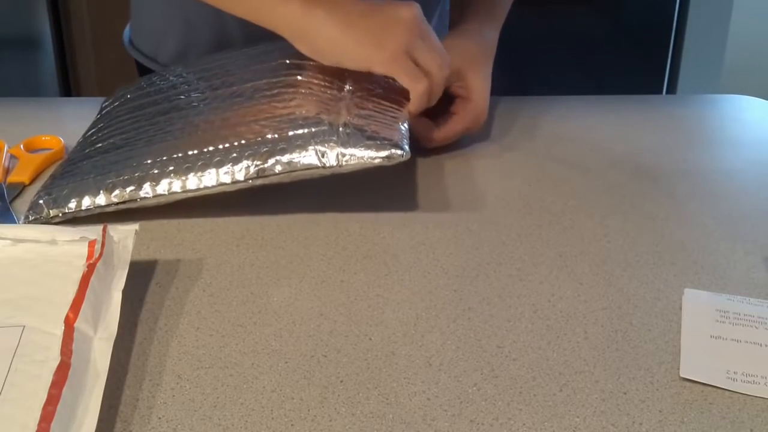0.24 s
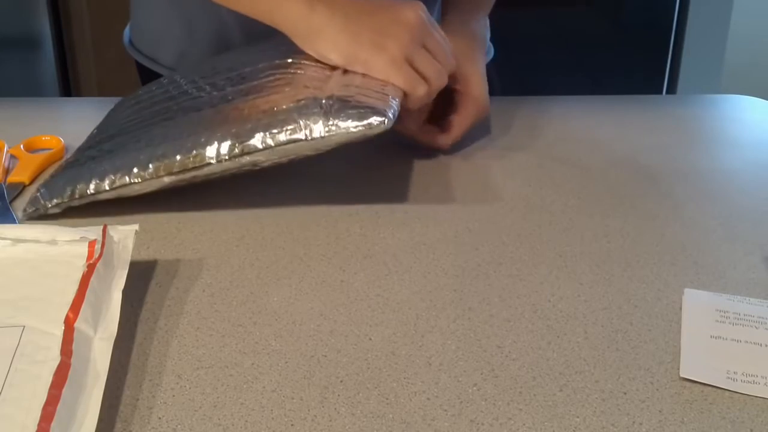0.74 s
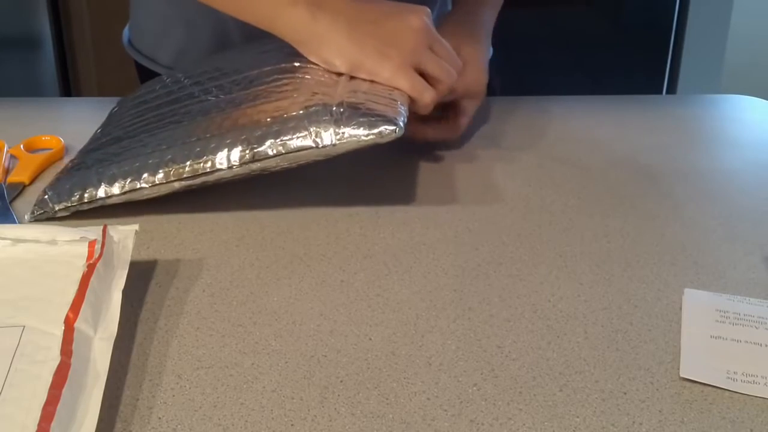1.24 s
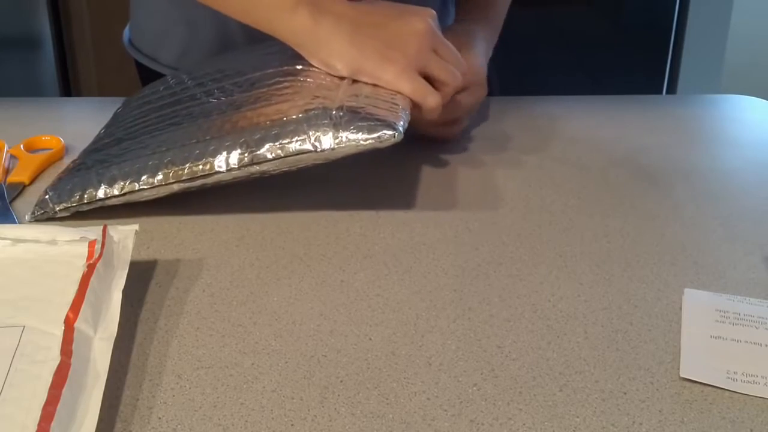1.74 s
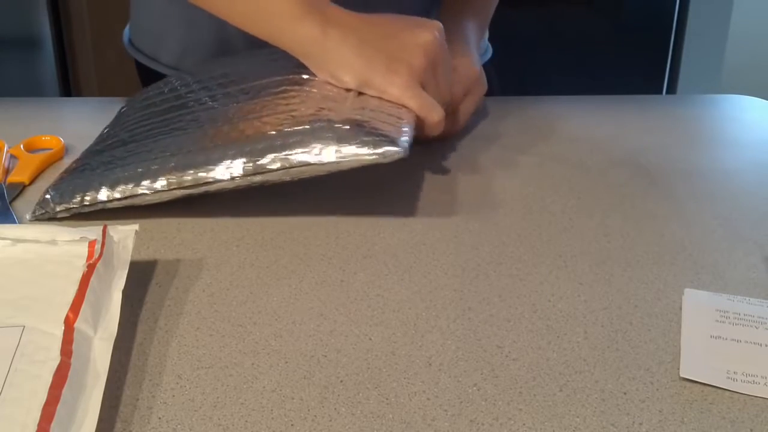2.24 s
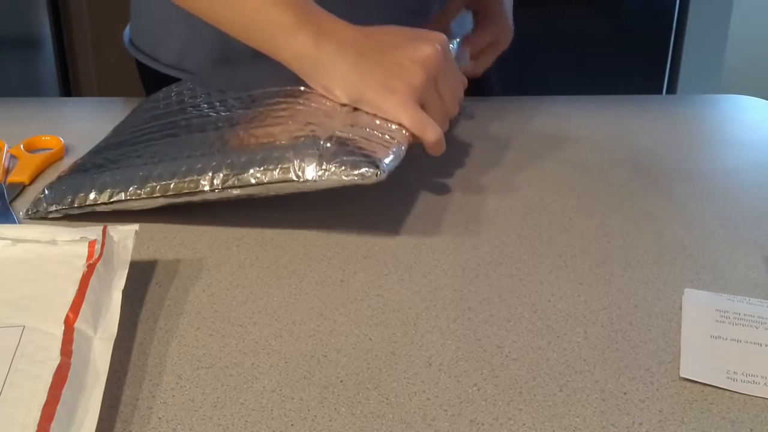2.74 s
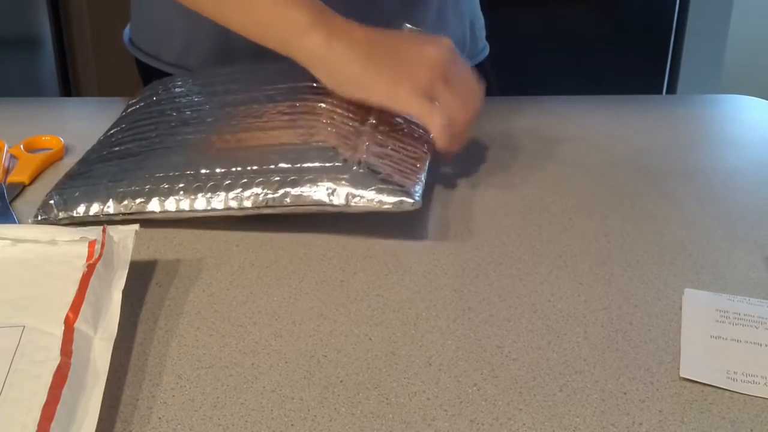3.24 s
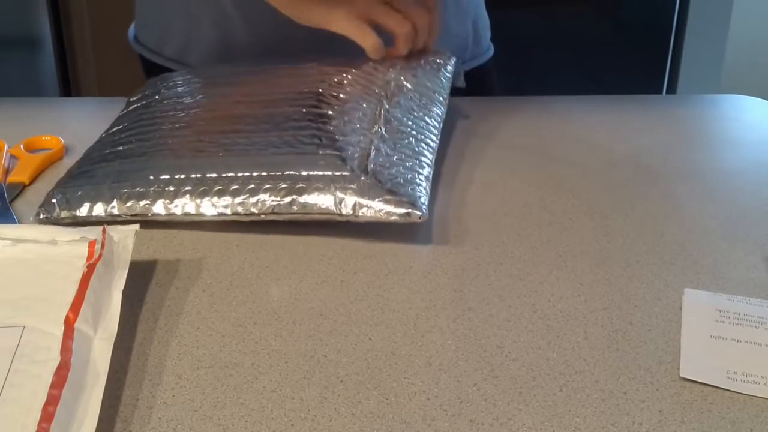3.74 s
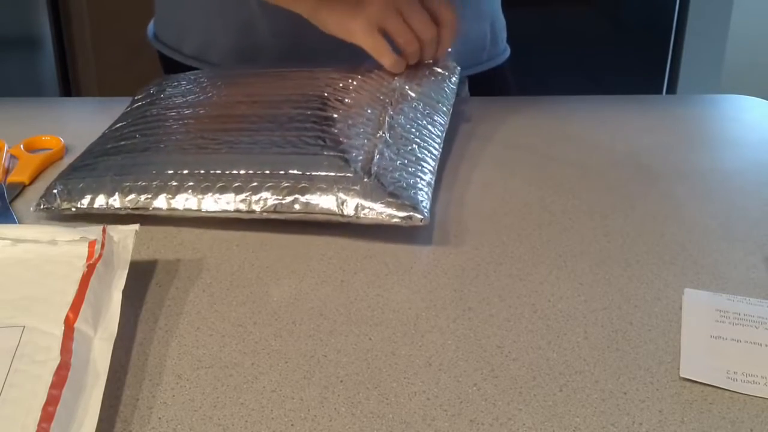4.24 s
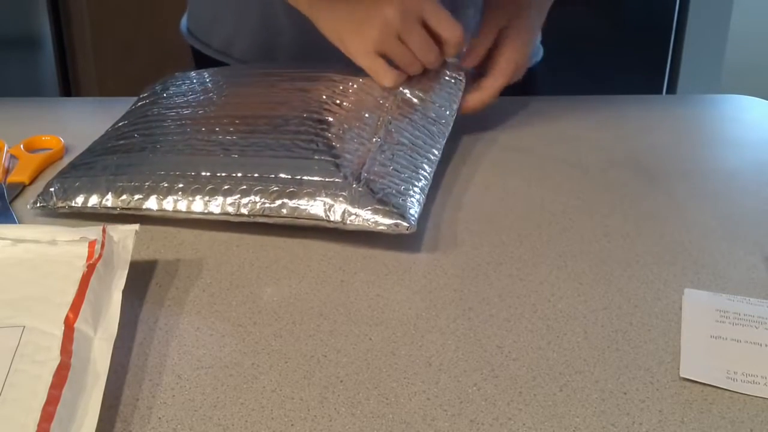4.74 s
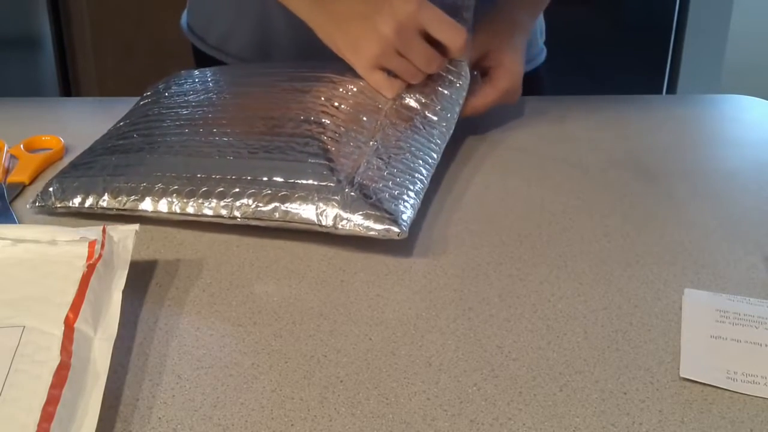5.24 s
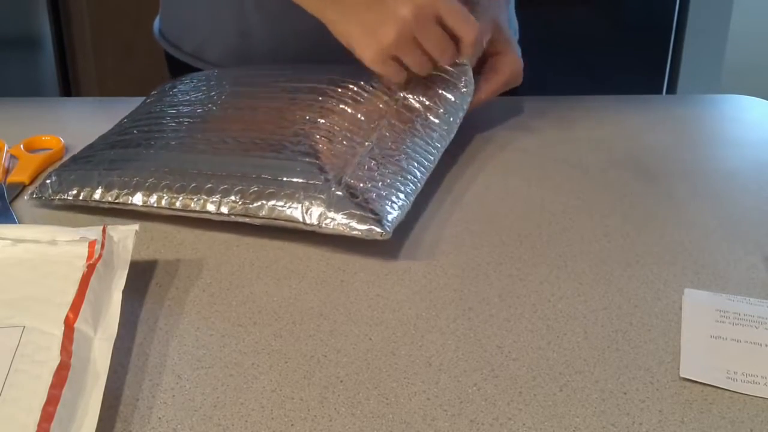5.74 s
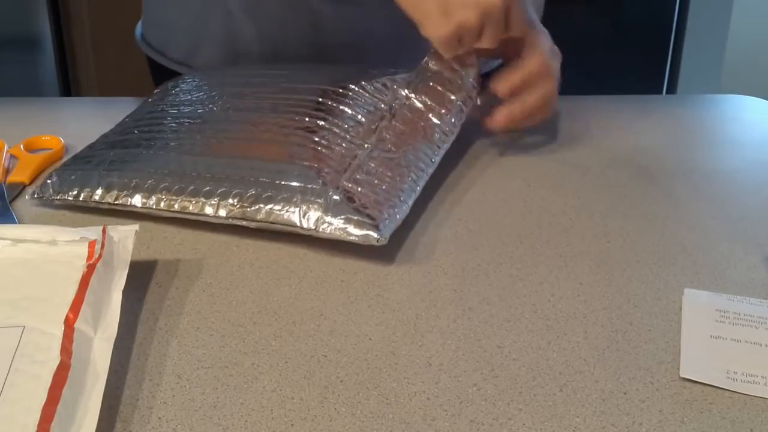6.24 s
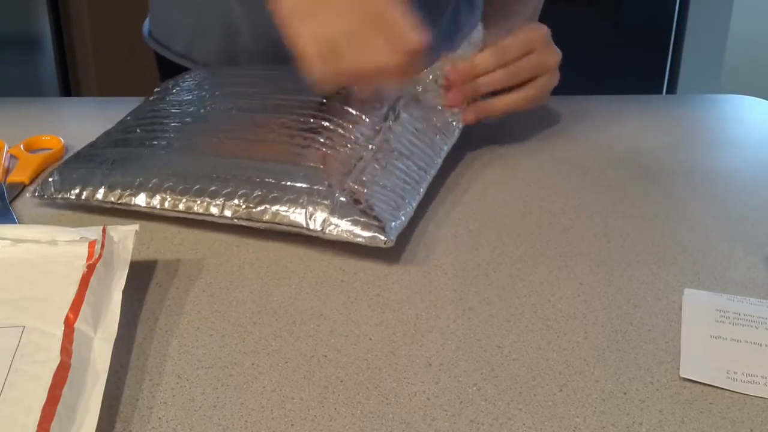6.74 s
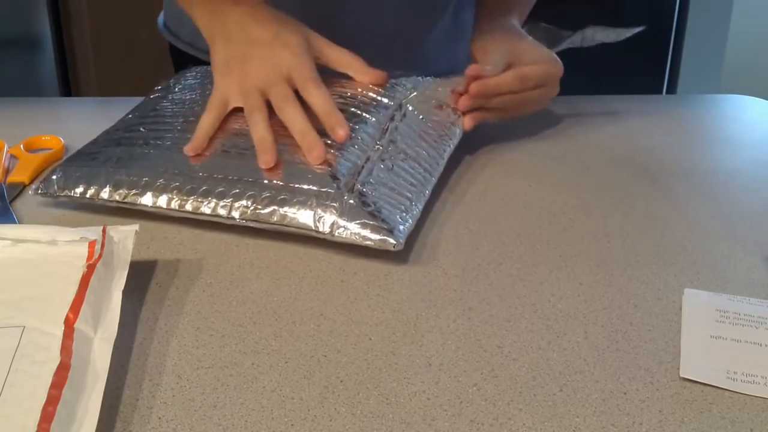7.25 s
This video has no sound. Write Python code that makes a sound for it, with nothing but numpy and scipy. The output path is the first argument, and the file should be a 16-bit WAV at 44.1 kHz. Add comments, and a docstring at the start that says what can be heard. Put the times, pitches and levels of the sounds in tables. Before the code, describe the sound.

Irregular crackling of stiff, padded foil, heard close in a small hard kitchen. Loud creases flip with crisp ticks and small hollow pops, a few with a soft low bump of the bag on the counter. A lull comes before the middle, then busy light crinkling resumes with occasional strong snaps toward the end. Quiet fridge hum continues throughout.

```python
"""A kitchen counter, heard from close by: hands pull and fold a foil bubble mailer over a refrigerator's hum.
Creases snap through singly and in dense runs, each a bright noise tick with a duller pop of the air cells;
clumps of tiny creases make the crackle under the grip, and low dying tones and a rustle are the bag's bumps.
Short echoes and a brief noise tail make the hard room, and a limiter holds the loudest snaps down."""
import sys
import numpy as np
from scipy import signal
from scipy.fft import rfft, irfft
from scipy.io import wavfile
from scipy.ndimage import uniform_filter1d, minimum_filter1d

SR = 44100
rng = np.random.default_rng(int(sys.argv[2]) if len(sys.argv) > 2 else 0)


def materialize(psi):
    """Save the field psi as 16-bit PCM at rate SR to the path in sys.argv[1].

    A 1-D psi becomes a single channel; in a 2-D psi each row is a channel.
    """
    bounded = np.clip(np.atleast_2d(psi).T, -1, 1)
    quanta = np.round(bounded * 32767).astype(np.int16)
    wavfile.write(sys.argv[1], SR, quanta)


N = 331191  # samples, about 7.5 s


def amp(db):
    """Turn dB into a linear gain."""
    return 10 ** (np.asarray(db) / 20)


def evened(x):
    """Scale a signal to rms 1."""
    return x / np.sqrt(np.mean(x ** 2) + 1e-20)


def read(points, hz):
    """Read a curve drawn over frequency, with straight lines along a log frequency axis."""
    f, value = np.transpose(points)
    return np.interp(np.log(hz + 1), np.log(f + 1), value)


def add(mix, s, sound):
    """Lay a sound into the mix from a time in seconds, cutting off what runs past the end."""
    part = mix[round(s * SR):][:len(sound)]
    part += sound[:len(part)]


# Colour of the kitchen air noise. Each row: frequency in Hz, relative spectral level in dB.
AIR_COLOUR = [(30, -29), (60, -15.5), (95, -3), (160, -5.5), (270, -7), (500, -11.5), (900, -14.5),
              (2200, -20.5), (6000, -28), (9000, -11.5)]
AIR_DB = -41.5  # rms of the whole air noise
# Refrigerator tones. Each row: centre pitch in Hz, wander in Hz (twice its rms), tone level in dB rms.
FRIDGE_TONES = [(160.6, 9.45, -62.5), (326.2, 3.95, -57.5), (478, 5.64, -65), (647, 4.4, -61.5),
                (742, 4.4, -63.5)]


def kitchen():
    """Steady air noise with the slightly wavering tones of a refrigerator."""
    hz = np.fft.rfftfreq(N, 1 / SR)
    spectrum = rfft(rng.standard_normal(N)) * amp(read(AIR_COLOUR, hz))
    out = amp(AIR_DB) * evened(irfft(spectrum, N))
    for tone_hz, wander_hz, db in FRIDGE_TONES:
        drift_hz = wander_hz / 2 * evened(uniform_filter1d(rng.standard_normal(N), 4000))
        phase = 2 * np.pi * np.cumsum(tone_hz + drift_hz) / SR
        out += amp(db) * np.sqrt(2) * np.sin(phase)
    return out


def burst(chance, length_s, body, hz, narrow_db):
    """A dying puff of noise in the colour of a body, leaning to one pitch; energy 1."""
    t, f = np.arange(512) / SR, np.fft.rfftfreq(1024, 1 / SR)
    envelope = np.exp(-t / length_s) * (1 - np.exp(-8 * t / length_s))
    puff = rfft(chance * envelope, 1024)
    puff /= np.abs(puff) ** .4 + 1e-9  # the shape varies, the colour stays fairly even
    # narrow_db is the loss one octave from the pitch; it grows with the square of the octaves
    colour = read(body, f) - narrow_db * np.log2((f + 1) / hz) ** 2
    sound = irfft(puff * amp(np.maximum(colour, -80)))
    sound = np.roll(sound, 24)[:512]  # room for a short fade-in
    sound *= np.exp(-t / (3 * length_s))
    sound *= np.minimum(t * SR / 24, 1) * np.cos(np.pi / 2 * t * SR / 512) ** 2
    hump = np.hanning(128).repeat(4)
    sound -= sound.sum() * hump / hump.sum()  # no net push of air
    return sound / np.linalg.norm(sound)


# Treble colour of the foil. Each row: frequency in Hz, gain in dB.
FOIL_COLOUR = [(1200, -24), (2100, -2), (3300, 0), (4700, -2.5), (5800, 0), (7000, 0), (9000, -2)]
# Colour of the padded air cells. Each row: frequency in Hz, gain in dB.
AIR_CELL_COLOUR = [(200, -34), (400, 10), (700, 3), (1200, 2), (2000, -1), (2800, -5.5), (3800, -18.5)]


def snap(hz, pop_hz, chance, narrow_db=14):
    """A crease flips: a bright tick of about a millisecond, and the air cells under it pop."""
    tick = burst(chance[:512], 0.0013, FOIL_COLOUR, hz, narrow_db)
    pop = burst(chance[512:], 0.0022, AIR_CELL_COLOUR, pop_hz, narrow_db=5.5)
    return 4.78 * tick, 11.25 * pop


def swarm(per_s, spread_db, count=24):
    """Many tiny creases of uneven size, coming in clumps: their ticks and their pops, each of rms 1."""
    clumps = amp(3 * evened(uniform_filter1d(rng.standard_normal(N), 300)))
    happens = rng.random(N) < clumps * per_s / SR
    size = happens * amp(spread_db * np.minimum(rng.exponential(1, N), 4))
    kind, out = rng.integers(0, count, N), np.zeros((2, N))
    for k, hz in enumerate(np.geomspace(2600, 7200, count)):
        shape = np.array(snap(hz, rng.uniform(400, 2700), rng.standard_normal(1024)))
        hits = (size * (kind == k))[None]
        out += signal.oaconvolve(hits, shape, axes=1)[:, :N]
    return evened(out[0]), evened(out[1])


# How hard the fingers work the foil. Each row: time in seconds, crackle level in dB.
GRIP_LEVEL = [(0.0, -56), (0.3, -58.5), (0.45, -47.5), (0.62, -42), (1.0, -44), (1.2, -55), (1.45, -47.5),
              (1.78, -60), (1.95, -44), (2.22, -49.5), (2.5, -47.5), (2.76, -51), (3.15, -52), (3.3, -42),
              (3.42, -60), (3.63, -55.5), (3.72, -46), (3.9, -54), (4.241, -40), (4.5, -65.5),
              (4.999, -39.5), (5.33, -56.5), (5.5, -56), (5.8, -46), (6.3, -48), (6.652, -38), (7.05, -47),
              (7.51, -42.5)]
SMALL_DB, SMALL_PER_S = -7.5, 65  # scattered small snaps: level relative to the fine crackle, base rate


def crackle(pop_db=-4):
    """The faint crackle of foil under the fingers, following the grip, with small snaps scattered through it."""
    s, level_db = np.transpose(GRIP_LEVEL)
    ticks, pops = swarm(per_s=300, spread_db=3.9)
    small_ticks, small_pops = swarm(per_s=SMALL_PER_S, spread_db=3.0)
    fine = ticks + amp(pop_db) * pops
    small = small_ticks + amp(pop_db) * small_pops
    level = amp(np.interp(np.arange(N) / SR, s, level_db))
    return level * (fine + amp(SMALL_DB) * small)


# Creases that snap clearly. Each row: time in seconds, level in dB, treble centre in Hz,
# air-cell pop level in dB relative to the treble, pop centre in Hz.
CLEAR_SNAPS = [(0.0237, -18, 7050, -20.5, 1940), (0.3091, -8, 5630, -14.5, 1290),
               (0.442, -23.5, 5100, -22, 1830.0), (0.499, -22, 6100, -28, 1810.0),
               (0.5179, -24, 6980.0, -7, 1430), (0.525, -18, 7300, -21, 1920.0),
               (0.5435, -5.5, 6130, -15.5, 1220), (0.6563, -6, 6440, -44, 1660),
               (0.6853, -8, 6200, -18.5, 2070), (0.7037, -9, 3750.0, -15, 2060),
               (0.7178, -13, 3650, -19, 2090.0), (0.721, -10, 3400, -10, 1220),
               (0.7307, -6, 5830, -18, 880.0), (0.735, 6.5, 6430, -11.5, 1290),
               (0.7387, 5.5, 5600.0, -8.5, 1640.0), (0.764, -4, 6630.0, -13, 1610),
               (1.0623, -15, 3950, -13.5, 720), (1.3517, -29.5, 5700, -4, 1030.0),
               (1.4394, -19, 6400, -26, 1120.0), (1.6005, -26.5, 6420.0, -8.5, 515),
               (1.6034, -23.5, 5840, -11, 500.0), (1.836, -22.5, 6100, -23, 1590.0),
               (1.8418, -14, 6250, -11, 2060), (1.8833, -26, 6500.0, -16, 1780),
               (1.9012, -18, 6290.0, -16.5, 2070.0), (1.9118, -4.5, 6640, -18.5, 2070),
               (1.915, -12.5, 6630.0, -17, 2060), (2.0075, -19, 4500, -6.5, 1600),
               (2.045, -5, 6260, -13, 1290), (2.0483, -17, 4030, -10, 820),
               (2.1178, -19, 6650, -23, 1920.0), (2.1413, -17.5, 5600, -16.5, 1250.0),
               (2.2506, -23, 4540.0, -18, 1280), (2.298, -27, 3360.0, -6, 1210.0),
               (2.3022, -17, 6400.0, -15, 1360.0), (2.3054, -18, 5860.0, -14, 1290.0),
               (2.3119, -8, 6090.0, -5.5, 1300), (2.3284, -6, 6310.0, -18, 1210.0),
               (2.3432, -22, 3800, 5.5, 800), (2.3472, -8, 6300, -8, 1290),
               (2.36, -13, 5940.0, -5.5, 970.0), (2.3658, -3.5, 6760.0, -23, 1050),
               (2.3912, -15.5, 3060.0, -9.5, 1900), (2.47, -23.5, 6600, -4, 1240),
               (2.5596, -32, 2520.0, -6, 990.0), (2.5666, -1.5, 6140, -13.5, 950),
               (2.6694, -7, 4540, -9.5, 1290.0), (2.6735, -6, 6480.0, -21, 1290.0),
               (2.679, -12.5, 3340.0, -6.5, 1100.0), (2.7043, -0.5, 3630, -12.5, 1060),
               (2.7104, -6, 3750, -12.5, 1080), (2.8658, -2.5, 3700, -8.5, 1140),
               (2.877, -10.5, 6650.0, -18.5, 1340.0), (2.891, -4, 6890.0, -16, 1640.0),
               (2.9088, -0.5, 7000, -17.5, 990), (3.2197, -20.5, 3580, -17, 2080),
               (3.2673, -34, 3270.0, -3, 1230.0), (3.281, -31, 5030, -28, 2130.0),
               (3.2937, -24, 5400, -26, 1590.0), (3.3154, -22, 5460, -18, 1790.0),
               (3.424, -48, 2520.0, 8, 1400.0), (3.527, -33, 6370, -5.5, 1880),
               (3.6739, -17.5, 5700, -19.5, 690.0), (3.7242, -22.5, 5040, -10.5, 940),
               (3.8319, -24, 3500, -14.5, 860), (3.9425, -26.5, 3440, -2, 990.0),
               (3.9497, -26.5, 5470.0, -9, 750.0), (3.9672, -27, 3340.0, -5.5, 840.0),
               (3.9764, -19, 5800, -25, 730.0), (4, -13.5, 6780.0, -18, 1670),
               (4.0026, -22, 2520.0, -5.5, 2020), (4.039, -22, 5340.0, -12, 2070.0),
               (4.0495, -15.5, 4500, -19, 825), (4.103, -24.5, 5800, -13, 2160),
               (4.1828, -14.5, 6860, -17.5, 780.0), (4.1997, -6, 7300, -17, 840.0),
               (4.304, -19.5, 5450, -27, 990.0), (4.314, -20.5, 5470.0, -16, 1680.0),
               (4.3317, -14.5, 6740.0, -22, 692), (4.335, -17, 3920.0, -21.0, 2260),
               (4.3685, -15.5, 5250, -20, 2310), (4.396, -26.5, 4410.0, -12.5, 1380.0),
               (4.5332, -20.5, 4870, -19.5, 1530.0), (4.6287, -39, 2630.0, 5.5, 1040),
               (4.6601, -17.5, 5640.0, -32, 1310.0), (4.695, -13, 5270, -18, 1130),
               (4.7252, -24, 5600.0, -27, 660), (4.7437, -22, 4670.0, -16, 1960.0),
               (4.7628, -14.5, 4540, -18.0, 1100.0), (4.832, -15, 6330, -28, 1230.0),
               (4.875, -22, 6720.0, -18.5, 1280), (4.8945, -11, 2520.0, -6.5, 1280),
               (4.8958, -11, 5500, -13, 1820), (4.9159, -16.5, 5470.0, -13, 2130.0),
               (4.9434, -13.5, 4180.0, -20, 2200.0), (4.9585, -21, 4950.0, -20, 1250.0),
               (4.9743, -15, 5620.0, -21, 1980.0), (4.9771, -14, 3140.0, -21, 2090.0),
               (5.0372, -11, 5300, -25, 670.0), (5.0643, -34, 5960.0, -18.0, 2080),
               (5.078, -21.5, 5300.0, -13.5, 1290.0), (5.112, -21, 5200, -22, 1840),
               (5.1625, -20.5, 4400, -13.5, 1740.0), (5.208, -22.5, 4220, -11.5, 1650),
               (5.2435, -24, 4240, -20, 1010.0), (5.361, -33, 5000, -25, 1500),
               (5.4088, -43.5, 2520.0, 9, 1420), (5.504, -26, 3840, -19, 1680.0),
               (5.563, -18, 5530, -38, 600.0), (5.6626, -28, 4200, -11, 1830),
               (5.692, -25, 4400, -24, 500.0), (5.7398, -24, 5560.0, -21, 1100.0),
               (5.747, -26, 3770.0, -3.5, 790), (5.7858, -17.5, 6330, -24, 1440.0),
               (5.7987, -18, 4630, -8.5, 1550), (5.8257, -25, 3720, -12.0, 1060.0),
               (5.8748, -25, 5160, -11, 1470), (5.9091, -36.5, 3490.0, 4, 1070),
               (5.932, -26, 4330, -25, 2220.0), (5.9478, -18.5, 6200.0, -19, 1120.0),
               (6.0044, -12, 5000, -10, 1180), (6.043, -16.5, 6720.0, -20, 1720),
               (6.0535, -14, 5540, -17.5, 1120.0), (6.1063, -21, 3520, -13, 1810.0),
               (6.1543, -19.5, 5430.0, -9, 1740.0), (6.1716, -22.5, 5470.0, -14, 750.0),
               (6.2049, -10.0, 6800, -17.5, 1750), (6.2246, -25.5, 4690.0, -9, 1070),
               (6.2558, -24.5, 7060.0, -10.5, 930.0), (6.316, -6, 5000, -24, 2200),
               (6.3618, -21, 5770.0, -16, 1830.0), (6.3764, -20.5, 4620, -12, 940),
               (6.3815, -24, 4520.0, -7.5, 970), (6.3934, -16.5, 5400.0, -15, 1850.0),
               (6.424, -25, 5340.0, -7.0, 1650), (6.4273, -32, 5620.0, 0, 1220),
               (6.444, -16.5, 4900, -19, 2280.0), (6.456, -16, 4500, -12.5, 1850.0),
               (6.4666, -16.5, 5060.0, -6.5, 1280), (6.4845, -13.5, 4180.0, -15.5, 1890.0),
               (6.5217, -11, 4260.0, -21, 1770.0), (6.5417, -22, 3770.0, -20, 1780),
               (6.551, -25, 5270, -19, 2150.0), (6.599, -9, 4430, -17, 1320),
               (6.6147, -20, 4290.0, -16, 900.0), (6.6265, -25, 3270.0, 5.5, 745),
               (6.6441, -12, 6180.0, -7.5, 1370), (6.6547, -7, 4350.0, -9.5, 1170),
               (6.6922, -4, 5700, -19, 1310), (6.7121, -23, 4440.0, -21, 880.0),
               (6.7355, -18, 4540.0, -21, 950.0), (6.7395, -18.5, 5450.0, -14, 2110.0),
               (6.768, -17, 5620.0, -15, 1210.0), (6.782, -3, 2510, -11, 800),
               (6.7926, -15, 5050, -24, 620.0), (6.8032, -3, 5600, -14.5, 1350),
               (6.94, -24, 3660.0, -12.5, 1360.0), (6.944, -25.5, 5430.0, -13, 2300),
               (6.9678, -18, 6400, -27, 1870.0), (6.994, -23.0, 5140, -25, 1010.0),
               (7.0166, -24, 6450, -20, 960), (7.061, -16, 5700, -38, 2260.0),
               (7.0945, -18.5, 5300, -20.5, 1270.0), (7.163, -17.5, 4500, -16.5, 1360.0),
               (7.168, -27, 5000, -5.5, 900), (7.18, -23, 5000, -7, 800), (7.19, -21, 5800, -9.5, 1290.0),
               (7.1949, -7, 5800, -14.5, 1400), (7.255, -14.5, 5300, -11, 770),
               (7.258, -17.5, 5000, -8.5, 1850), (7.281, -30, 2520.0, 0.5, 1350),
               (7.302, -18, 4590.0, -15, 1090), (7.3106, 2, 5000, -23, 2090.0),
               (7.314, 1.5, 6800, -18.0, 2020.0), (7.343, -23, 3700, -11, 1420.0),
               (7.389, -17, 4090.0, -16, 1230.0), (7.404, -16, 6610.0, -29, 730.0),
               (7.4319, -26, 3600.0, -31, 800.0), (7.441, -19, 5230.0, -29, 1430),
               (7.4565, -25, 6780.0, -25, 1510.0), (7.4645, -16, 5940.0, -22, 1010.0),
               (0.1607, -29, 7050, -27, 1500), (1.133, -30, 6900, -5.5, 563), (1.786, -36, 5360, -7, 1200),
               (1.96, -24, 7000, -12, 1200), (2.8643, -3.5, 5000, -11, 890),
               (3.0876, -32, 3400, -7.5, 1900), (3.1362, -29, 3500, -15, 1400),
               (3.591, -31, 5000, -10.5, 1210), (5.6466, -27, 5970, -25, 900)]
# A loud snap is broad, a faint one leans harder to its own pitch:
NARROW_DB, NARROW_PER_DB = 11, 1.5  # loss one octave off for a snap at 0 dB, extra loss per dB fainter
ROOM_NARROW_SHARE = 0.34  # a crease beams its pitch at the microphone; the room hears a broader snap


def snaps():
    """The clear snaps, each with its own shape and air cell: as heard close, and as sent round the room."""
    out, chances = np.zeros((2, N)), rng.standard_normal((len(CLEAR_SNAPS), 1024))
    for (s, db, hz, pop_db, pop_hz), chance in zip(CLEAR_SNAPS, chances):
        narrow_db = max(NARROW_DB - NARROW_PER_DB * db, 0)
        for mix, share in zip(out, (1, ROOM_NARROW_SHARE)):
            tick, pop = snap(hz, pop_hz, chance, share * narrow_db)
            start_s = s - 24 / SR  # allow for the fade-in
            add(mix, start_s, amp(db) * (tick + amp(pop_db) * pop))
    return out


def swell(t, length_s, rise_share=0.13):
    """Outline of a giving fold: a rise over a share of the length, then a bell-shaped fall."""
    return np.exp(-(t / length_s) ** 2) * (1 - np.exp(-t / (rise_share * length_s)))


# A fold gives way in a dense run of creases. Each row: start in seconds, level in dB, length in seconds,
# treble centre in Hz, pop level in dB relative to the treble, pop centre in Hz.
FOLD_RUNS = [(0.312, -36, 0.06, 6500, 0, 1300), (0.536, -31, 0.066, 6200, -4, 1300),
             (0.729, -14.5, 0.021, 6440, 5, 1500), (0.762, -24.5, 0.11, 3500, 3, 1810),
             (1.838, -42, 0.13, 6500, 8, 700), (2.294, -27, 0.12, 6080, -0.5, 1300),
             (2.6685, -15.5, 0.015, 3380, 3, 1110), (2.859, -23.5, 0.064, 6000, -2, 930),
             (4.197, -22.5, 0.012, 6800, -2.5, 800), (4.323, -31.5, 0.046, 4300, -7, 1200),
             (4.892, -32.5, 0.055, 4600, 4.5, 1950), (6.608, -32, 0.057, 5000, -1, 1000),
             (6.651, -19.5, 0.011, 5500, -4, 1100), (6.785, -23.5, 0.015, 5000, 2, 910)]
TRAIL_DB, TRAIL_S = -17.5, 0.0045  # neighbours dragged by a snap: level relative to it, length
RUN_TREBLE_Q, RUN_POP_Q = 0.33, 1  # how closely a run keeps to the pitches of its fold
RUN_RING_DB, RUN_RING_Q = -4.5, 5.5  # the fold also rings at its own treble pitch: level, sharpness


def rips():
    """Dense runs of creases that swell quickly and stop as the fold settles; a short one trails every snap."""
    creases = np.pad(swarm(per_s=1800, spread_db=3.0), ((0, 0), (0, SR)))
    out = np.zeros(N)
    trails = [(s, db + TRAIL_DB, TRAIL_S, hz, pop_db, pop_hz) for s, db, hz, pop_db, pop_hz in CLEAR_SNAPS]
    for s, db, length_s, hz, pop_db, pop_hz in [*FOLD_RUNS, *trails]:
        t = np.arange(round(3 * length_s * SR)) / SR
        run = amp(db) * swell(t, length_s)
        ticks, pops = creases[:, round(s * SR):][:, :len(t)] * run
        treble = signal.lfilter(*signal.iirpeak(hz, RUN_TREBLE_Q, fs=SR), ticks)
        ring = signal.lfilter(*signal.iirpeak(hz, RUN_RING_Q, fs=SR), ticks)
        popping = signal.lfilter(*signal.iirpeak(pop_hz, RUN_POP_Q, fs=SR), pops)
        add(out, s, treble + amp(RUN_RING_DB) * ring + amp(pop_db) * popping)
    return out


# Bumps on the counter. Each row: start in seconds, level in dB before the decay, ring pitch in Hz.
BUMPS = [(0.308, -34, 126), (0.738, -22.5, 252), (1.133, -32, 108), (2.329, -37, 233), (2.67, -29.5, 254),
         (2.868, -35, 294), (4.2, -43, 237), (6.641, -35.5, 205)]
BUMP_DB, BUMP_S = -5.5, 0.031  # padding rustle at a bump: level relative to its ring, decay time
SHIFT_DB, SHIFT_HZ = -22, (88, 530)  # bag shifting under a fold: level relative to the run; rustle band


def thuds():
    """The padded bag bumps the counter, a dull low ring, and shifts with a low rustle while a fold gives way."""
    out, level, t = np.zeros(N), np.zeros(N), np.arange(SR // 3) / SR
    for s, db, hz in BUMPS:
        decay = amp(db - 60 * t / 0.11)  # 60 dB down in 0.11 s
        add(out, s, decay * np.sin(2 * np.pi * hz * t) * (1 - np.exp(-t / 0.003)))
        add(level, s, amp(db + BUMP_DB) * np.exp(-t / BUMP_S))
    for s, db, length_s, *_ in FOLD_RUNS:
        add(level, s, amp(db + SHIFT_DB) * swell(t, length_s))
    band = signal.butter(2, SHIFT_HZ, "band", fs=SR, output="sos")
    rustle = signal.sosfilt(band, rng.standard_normal(N))
    return out + level * evened(rustle)


# Decay of the hard room. Each row: frequency in Hz, time to fall 60 dB in seconds.
ROOM_DECAY = [(250, 0.57), (700, 0.46), (1800, 0.61), (4500, 0.47), (7500, 0.6)]
# Single echoes off counter and cupboards. Each row: delay in seconds, level in dB relative to the direct sound.
EARLY_ECHOES = [(.0011, -13), (.0034, -16), (.0058, -16), (.0105, -19), (.0155, -20), (.021, -21)]


def room(close, broad, wet_db=-11):
    """Single echoes off counter and cupboards, then a dense tail; three tails take turns as the bag moves."""
    early = np.zeros(1200)
    early[0] = 1  # direct sound
    for s, db in EARLY_ECHOES:
        early[round(s * SR)] = amp(db)
    out = signal.oaconvolve(close, early)[:N]
    # each frequency band of the noise dies at its own rate
    hz, t, z = signal.stft(rng.standard_normal((3, SR // 2)), SR, nperseg=256)
    fading = z * amp(-60 * t / read(ROOM_DECAY, hz)[:, None])
    tails = signal.istft(fading, SR, nperseg=256)[1]
    tails *= 1 - np.exp(-(np.arange(tails.shape[1]) / SR / .004) ** 2)  # the tail builds up
    for k, tail in enumerate(tails):
        turn = np.cos(2 * np.pi * (3.5 * np.arange(N) / SR + k / 6))
        share = np.sqrt(2 / 3) * turn  # the three powers always add up to 1
        out += amp(wet_db) * signal.fftconvolve(broad * share, tail / np.linalg.norm(tail))[:N]
    return out


def scene():
    """The foil and the bumps sounding in the room, over the kitchen's own noise."""
    low_cut = signal.butter(2, 170, "high", fs=SR, output="sos")  # thin film moves no bass
    foil = signal.sosfilt(low_cut, snaps() + rips() + crackle())
    close, broad = foil + thuds()
    return (room(close, broad) + kitchen())[None]


THRESHOLD_DB = -4.5  # the limiter starts to act here
EDGE_HZ = 7420  # top of the band


def record(dry):
    """A limiter that looks slightly ahead and takes off most of any excess; bass roll-off, band limit."""
    peak_db = 20 * np.log10(abs(dry[0]) + 1e-9)
    fall = np.arange(N) * 450 / SR  # the tracked peak sinks 450 dB per second
    held_db = np.maximum.accumulate(peak_db + fall) - fall
    over_db = np.maximum(held_db - THRESHOLD_DB, 0)
    ahead_db = -minimum_filter1d(-over_db, size=200)  # the largest excess nearby
    x = dry / amp(.8 * uniform_filter1d(ahead_db, size=200))
    x = signal.sosfilt(signal.butter(3, 62, "high", fs=SR, output="sos"), x)
    return signal.sosfilt(signal.cheby1(12, .5, EDGE_HZ, fs=SR, output="sos"), x)


dry = scene()
out = record(dry)
materialize(out)
```